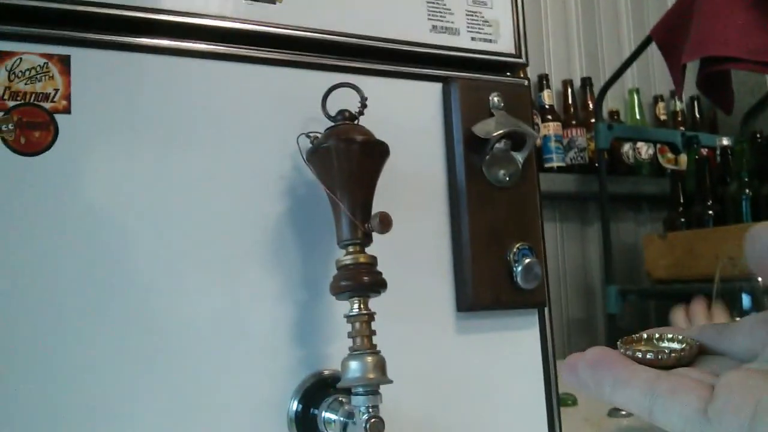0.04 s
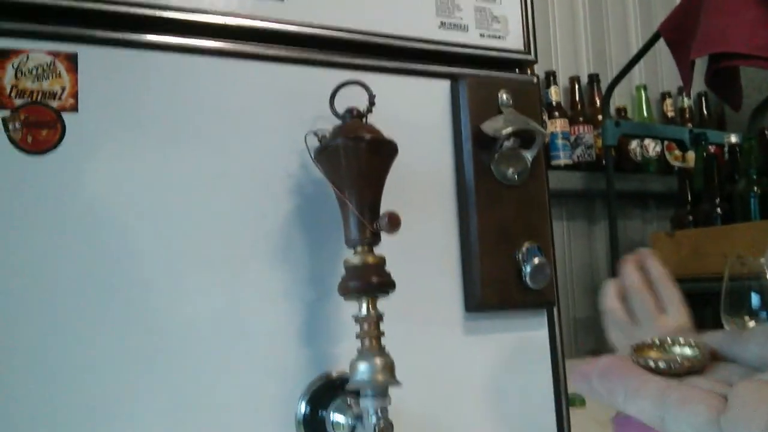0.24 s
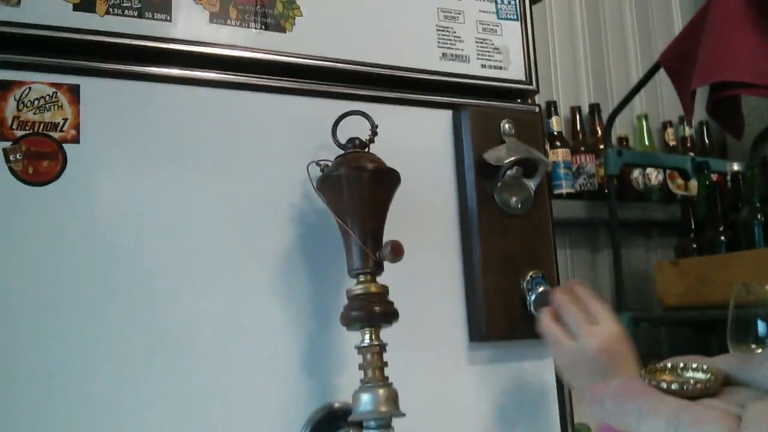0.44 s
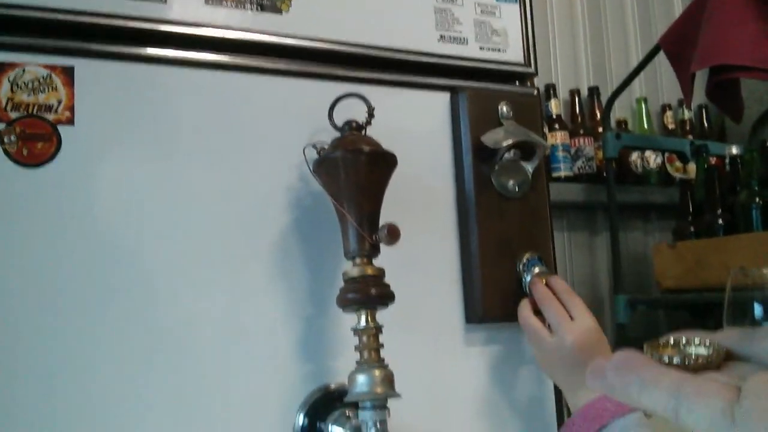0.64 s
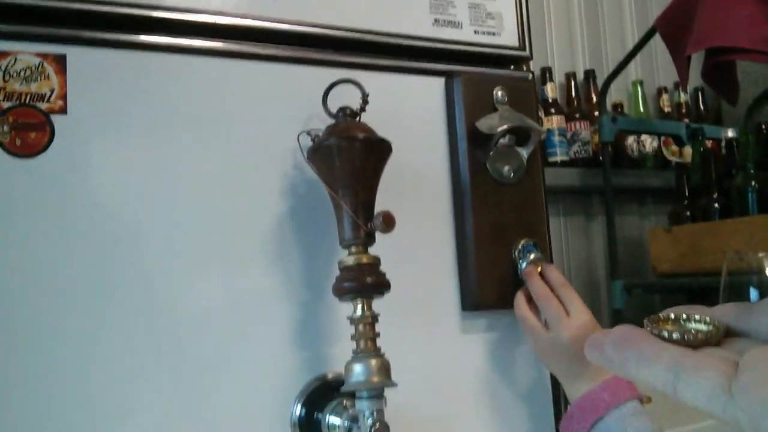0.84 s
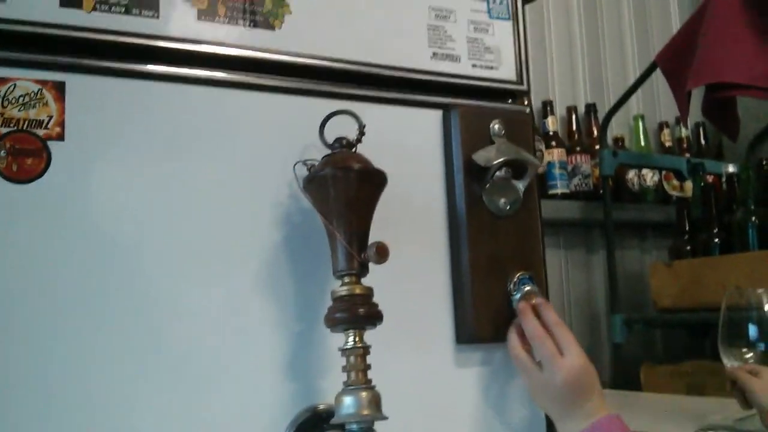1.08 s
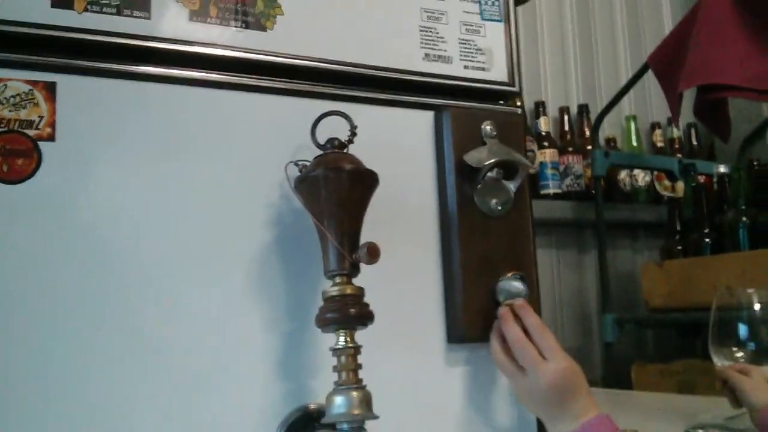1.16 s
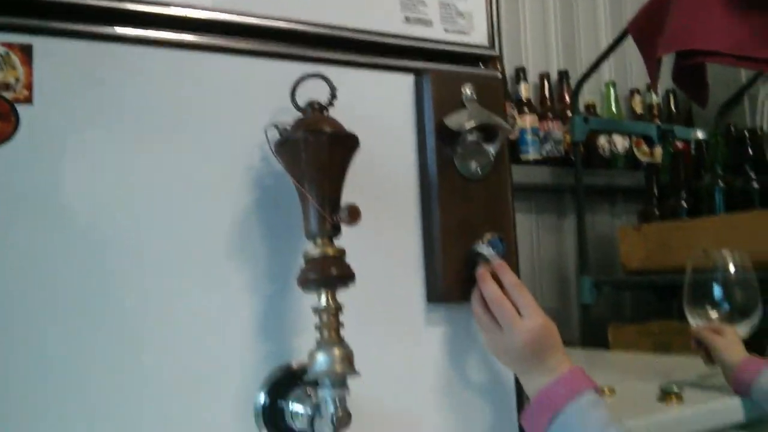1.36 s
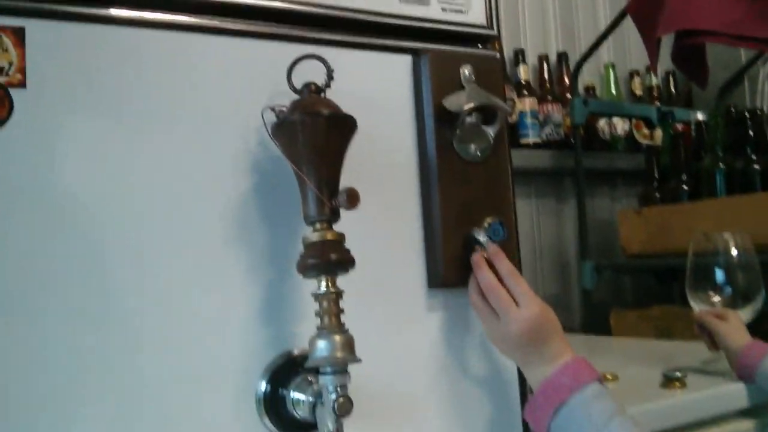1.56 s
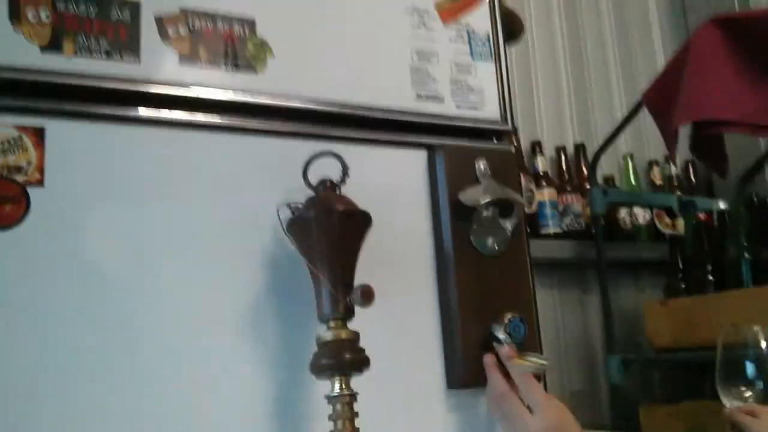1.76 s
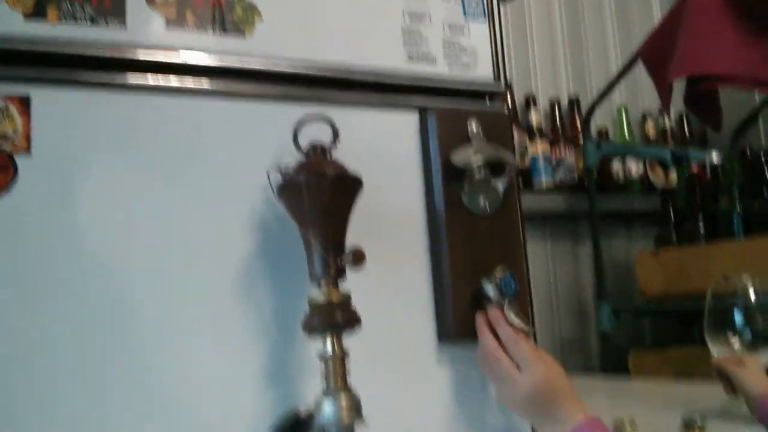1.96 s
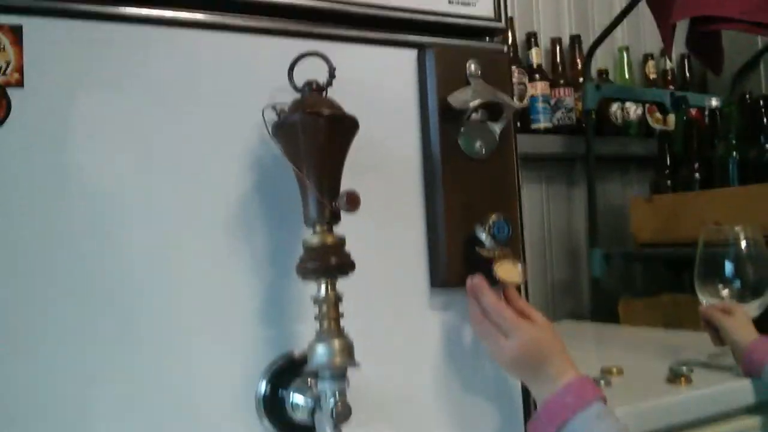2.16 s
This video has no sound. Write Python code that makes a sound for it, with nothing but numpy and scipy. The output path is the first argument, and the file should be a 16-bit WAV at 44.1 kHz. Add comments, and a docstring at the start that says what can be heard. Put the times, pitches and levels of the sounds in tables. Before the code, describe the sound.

Three bright metallic clicks of bottle caps snapping to a wall magnet, with tiny scrapes between

```python
"""A small room with a wooden wall board: steel bottle caps are offered by hand to a magnet in it. Each landing
is a few contacts that ring cap modes, clash the rim as noise and knock board modes. Between clacks, caps scrape
(random slips through resonances), tap, squeak (gliding sine) and rustle (noise). A cooler hums steadily behind:
unsteady motor tones over low noise. Apart from it, faint low thumps and thin tones swell and fade now and then."""
import sys
import numpy as np
from scipy import signal
from scipy.fft import rfft, irfft, next_fast_len
from scipy.io import wavfile
from scipy.ndimage import map_coordinates

SR = 44100
rng = np.random.default_rng(int(sys.argv[2]) if len(sys.argv) > 2 else 0)


def inscribe(sig):
    """Save sig as 16-bit PCM at rate SR to the path in sys.argv[1].

    A 1-D sig is mono; a 2-D sig holds one channel per row.
    Samples are clipped to [-1, 1] before scaling.
    """
    pcm = np.round(np.clip(np.atleast_2d(sig).T, -1, 1) * 32767)
    wavfile.write(sys.argv[1], SR, pcm.astype(np.int16))


N = 97946

# cooler motor tones: f/Hz, rms level/dB, waver/dB
HUM_TONES = [(49, -63, 3), (235, -63, 3), (328, -59.5, 1.8)]
# spectrum of the cooler's air rush: f/Hz, relative density/dB
AIR_SPECTRUM = [(15, -34.5), (25, -7), (76, 1.5), (161, -6.5), (229, 0), (277, -8.5), (344, -12.5),
                (384, -18), (560, -27.5), (775, -15.5), (840, -25), (1290, -29.5), (1440, -43.5),
                (1840, -39.5), (2220, -54), (2990, -51), (3340, -64.5), (5880, -43.5), (16000, -51.5)]
# gain over the whole cooler: t/s, level/dB
COOLER_LEVEL = [(0, -2), (.15, -0.5), (.6, 1), (1.1, 1), (1.5, 0), (1.9, 0.5), (2.2, 1.5)]
HUM_DRIFT_HZ, AIR_DB, AIR_SWELL_DB = 1.5, -53, 1
# faint tones that come and go: t/s, length/s, f/Hz, level/dB
SWELLS = [(0.132, 0.061, 100, -45.5), (.58, 0.064, 74, -45.5), (1.0, 0.081, 65.3, -46),
          (0.71, 0.46, 2730, -82.5), (1.823, 0.093, 213.3, -48), (1.85, 0.27, 476.5, -57.5)]

# spectrum of hands and sleeves: f/Hz, relative density/dB
RUSTLE_SPECTRUM = [(500, -8.5), (1000, 6.5), (2000, -12), (3500, -13.5), (6000, -8.5), (10000, -19.5),
                   (16000, -27)]
# rustle envelope: t/s, rms level/dB
RUSTLE_LEVEL = [(0, -70.5), (.22, -75.5), (.4, -82), (.75, -71), (1.1, -67.5), (1.5, -71), (1.65, -71),
                (1.8, -75), (2.2, -72)]

# cap edge squeaking as it slides: t/s, f/Hz, level/dB
SQUEAK = [(0.942, 3700, -106), (0.971, 3690, -68), (1.03, 3750, -73), (1.08, 4000, -80), (1.102, 3930, -70)]
SQUEAK_JITTER_HZ = 100

# cap shifts in the hand, drags onto the magnet, is pressed home or rocks flat:
# t/s, length/s, share of length spent swelling, level/dB, kind
SCRAPES = [(1.082, .03, 0.77, -55.5, "shift"), (1.099, 0.014, 0.63, -45.5, "shift"),
           (1.114, 0.035, 0.074, -46.5, "shift"), (1.1931, 0.028, 0.15, -32, "drag"),
           (1.206, 0.024, 0.31, -31.5, "drag"), (1.59, 0.051, 0.61, -53, "press"),
           (1.623, 0.14, 0.284, -61, "press"), (1.824, 0.054, 0.53, -68.5, "press"),
           (1.964, 0.014, 0.52, -24, "rock")]
# cap resonances by kind of scrape: f/Hz, width/Hz, level/dB
SCRAPE_RINGS = {"shift": [(3480, 240, -2.5), (3613, 200, 8), (3840, 340, 4.5), (5200, 540, -6.5),
                (6460, 650, -10), (8110, 900, -15)], "drag": [(4270, 230, -4.5), (4650, 200, -11),
                (5550, 560, 1), (6620, 400, 1), (8180, 400, 1), (9800, 1200, -2)],
                "press": [(3600, 190, -11.5), (4570, 300, 4), (5600, 390, 9.5), (7150, 3600, 1)],
                "rock": [(2640, 149, -8), (3075, 120, 0.5), (3368, 310, 0.5)]}
SLIPS_PER_S, FINGER_DAMP_HZ = 3400, 9700

# a faint tick near the start, then light knocks as caps settle: t/s, f/Hz, level/dB, t60/s
TAPS = [(0.147, 7000, -48, .002), (1.611, 3550, -48, .02), (1.613, 4700, -42, .025),
        (1.614, 5700, -39, .012), (1.617, 1090, -44, .06), (1.73, 780, -53, .06), (1.975, 1300, -37, .03)]
TAP_RISE_S = 0.00095

# cap modes by landing: f/Hz, level/dB, t60/s
FIRST_CAP = [(3620, -7, 0.085), (3968, -5.5, 0.063), (4370, -3, 0.051), (4573, -1.5, 0.049),
             (4750, -11, .033), (5960, -3.5, 0.035), (6133, -1, .06), (6230, -3.5, .022), (8317, 1, 0.019),
             (8230, -1, 0.033), (8505, -2, 0.01), (9200, -4.5, 0.017), (13000, -9.5, 0.018)]
SECOND_CAP = [(3990, -5.5, .024), (4240, 0, 0.017), (4386, -0.5, 0.024), (4580, -0.5, 0.03),
              (5490, -13.5, 0.034), (6270, 0, 0.033), (6340, 4.5, .026), (6350, -0.5, .024),
              (7000, -1, 0.022), (7040, 1.5, 0.023), (10430, -7.5, .018)]
THIRD_RIM = [(3300, -9, 0.045), (4030, -5.5, 0.038), (5610, 9, 0.0095), (5835, 7.5, 0.052), (7480, 2, .022),
             (9370, -8, 0.025)]
THIRD_FLAT = [(5020, -12.5, 0.089), (5650, -6, 0.048), (6500, -4.5, 0.024), (7410, 0, .022),
              (7590, 2, 0.02), (7670, 2.5, .018), (8020, 7, .013), (8230, 3, 0.01), (8640, 2.5, .016)]
# pitches at which the clash of the crimped rim is coloured: f/Hz
CLASH_HZ = [700, 2800, 3900, 5200, 6200, 7300, 8600, 10300, 12000, 15500]
# clash colour by landing, one per CLASH_HZ: relative level/dB
FIRST_CLASH = [-23, -7.5, -10.5, -9.5, 0.5, -4.5, 1, -10.5, -19.5, -24]
SECOND_CLASH = [-35, -11.5, -5, -5, 9, 0.5, 7, 0.5, -10, -17.5]
RIM_CLASH = [-23, -10.5, 3, 2.5, 10.5, 9.5, 14, -6, 3.5, -8]
FLAT_CLASH = [-28, -13.5, -11, -7.5, -1.5, 3, 2, -15, -15.5, -21.5]
# the above grouped by landing: cap modes, clash colour, clash t60/s
CAPS = {"first": (FIRST_CAP, FIRST_CLASH, 0.029), "second": (SECOND_CAP, SECOND_CLASH, 0.037),
        "rim": (THIRD_RIM, RIM_CLASH, 0.073), "flat": (THIRD_FLAT, FLAT_CLASH, 0.019)}
# contacts of cap, magnet and board: t/s, ring level/dB, clash level/dB, knock level/dB, landing
CONTACTS = [(0.5236, -18, -18, -29.5, "first"), (0.5277, -28, -18.5, -38.5, "first"),
            (0.534, -39, -22, -56, "first"), (1.2155, -37, -27, -69, "second"),
            (1.2317, -16, -14.5, -32, "second"), (1.2373, -22.5, -15.5, -29.5, "second"),
            (1.2424, -31, -30.5, -44.5, "second"), (1.9370, -39, -21, -33.5, "rim"),
            (1.9396, -22.5, -28, -46, "rim"), (1.9621, -30, -17, -60, "flat"),
            (1.9634, -15, -8, -38.5, "flat")]
# wooden board modes: f/Hz, level/dB, t60/s
BOARD_MODES = [(140, -6.5, 0.07), (176.5, -1.5, 0.069), (702.5, -10.5, 0.1), (1100, -2, .04),
               (1263, -3, .035), (1440, -4.5, 0.046), (1876, -3, 0.029), (2287, -14, 0.11)]
RING_RISE_S, CLASH_RISE_S, BOARD_RISE_S = 0.0006, 0.00084, 0.0016
SCATTER_DB = 1.5  # spread of mode levels, blow to blow
PHASE_JITTER_RAD, PHASE_STEP_S = 0.55, 0.002  # roughens and slightly widens each mode

# room decay: f/Hz, t60/s
ROOM_T60 = [(150, 0.44), (700, 0.26), (2000, 0.25), (5000, 0.27), (8000, 0.23), (15000, 0.24)]
# room echo colour: f/Hz, relative level/dB
ROOM_COLOUR = [(150, 3.5), (1000, 2.5), (3000, -4), (6000, 2.5), (9000, 3), (15000, 4)]
ROOM_DB, ROOM_DELAY_S, ROOM_BUILD_S = -5.5, 0.0069, 0.001
WASH_DB, WASH_T60_S = -34, 0.79  # weak late echo
ROOM_BLUR, ROOM_BLUR_PER_S = 0.016, 260  # echo speed waver: fraction, knots/s

CEILING, TOP_HZ = 0.6, 15900


def amp(db):
    """Decibels to gain."""
    return 10 ** (np.asarray(db) / 20)


def unit(x):
    """Scale to rms 1."""
    return x / np.sqrt(np.mean(x ** 2) + 1e-20)


def along(points, hz):
    """Interpolate (f/Hz, value) points on a log axis."""
    f, v = np.transpose(points)
    return np.interp(np.log(hz + 1), np.log(f + 1), v)


def level(rows):
    """Gain per sample from (t/s, level/dB) points."""
    return amp(np.interp(np.arange(N) / SR, *np.transpose(rows)))


def wobble(knots_per_s):
    """Smooth random curve through normal-distributed knots."""
    knots = rng.standard_normal(int(N * knots_per_s / SR) + 4)
    return map_coordinates(knots, [np.arange(N) * knots_per_s / SR])


def filtered(x, response):
    """Multiply the spectrum of x by a response of frequency."""
    m = next_fast_len(len(x) + SR // 2)
    return irfft(rfft(x, m) * response(np.fft.rfftfreq(m, 1 / SR)), m)[:len(x)]


def noise(spectrum, size):
    """Coloured noise of rms 1."""
    return unit(filtered(rng.standard_normal(size), lambda hz: amp(along(spectrum, hz))))


def tone(hz):
    """Sine that follows a pitch given per sample."""
    return np.sin(2 * np.pi * np.cumsum(hz) / SR)


def fade(t, t60):
    """Exponential decay, -60 dB at t60."""
    return np.exp(-np.log(1000) * t / t60)


def rise(t, rise_s):
    """Exponential onset of a blow."""
    return 1 - np.exp(-t / rise_s)


def ring(modes, t):
    """Damped modes with scattered levels; random phase jitter roughens and slightly widens each."""
    out = np.zeros(len(t))
    for hz, db, t60 in modes:
        gain = amp(db + SCATTER_DB * rng.normal())
        knots = rng.standard_normal(400)
        jitter = PHASE_JITTER_RAD * np.interp(t, np.arange(400) * PHASE_STEP_S, knots)
        out += gain * fade(t, t60) * np.sin(2 * np.pi * hz * t + jitter)
    return out


def add(track, s, sound):
    """Mix a sound in at time s."""
    part = track[round(s * SR):][:len(sound)]
    part += sound[:len(part)]


def in_room(x):
    """Direct sound plus a delayed noise-tail echo whose pitch wavers, blurring any ring."""
    hz, t, z = signal.stft(rng.standard_normal(SR), SR, nperseg=256)
    decay = fade(t, along(ROOM_T60, hz)[:, None]) + amp(WASH_DB) * fade(t, WASH_T60_S)
    colour = amp(along(ROOM_COLOUR, hz))[:, None]
    tail = signal.istft(z * decay * colour, SR, nperseg=256)[1]
    since_delay = np.maximum(np.arange(len(tail)) / SR - ROOM_DELAY_S, 0)
    tail = tail * rise(since_delay, ROOM_BUILD_S)
    echo = signal.fftconvolve(x, amp(ROOM_DB) * tail / np.linalg.norm(tail))
    speed = 1 + ROOM_BLUR * wobble(ROOM_BLUR_PER_S)[:len(echo)]
    echo = map_coordinates(echo, [np.cumsum(speed)])
    add(echo, 0, x)
    return echo


def cooler():
    """Motor tones unsteady in pitch and level, over a low rush of air."""
    tones = np.zeros(N)
    for hz, db, waver_db in HUM_TONES:
        gain = amp(db + waver_db * wobble(6.1)) * np.sqrt(2)  # rms to peak
        tones += gain * tone(hz + HUM_DRIFT_HZ * wobble(5.2))
    air = amp(AIR_DB + AIR_SWELL_DB * wobble(6.9)) * noise(AIR_SPECTRUM, N)
    return level(COOLER_LEVEL) * (tones + air)


def swells():
    """Faint sines under sin-squared envelopes, random in phase."""
    out = np.zeros(N)
    for s, length, hz, db in SWELLS:
        t = np.arange(round(length * SR)) / SR
        envelope = amp(db) * np.sin(np.pi * t / length) ** 2
        add(out, s, envelope * np.sin(2 * np.pi * (hz * t + rng.random())))
    return out


def rustle():
    """Hands and sleeves: coloured noise under a slow envelope."""
    return level(RUSTLE_LEVEL) * noise(RUSTLE_SPECTRUM, N)


def squeak():
    """Sliding cap edge: a thin, jittery tone, climbing for most of its course."""
    s, hz, db = np.transpose(SQUEAK)
    t = np.arange(N) / SR
    pitch = np.interp(t, s, hz) + SQUEAK_JITTER_HZ * wobble(970)
    sounding = (t > s[0]) * (t < s[-1])
    return amp(np.interp(t, s, db)) * sounding * tone(pitch)


def held_cap(rings, hz):
    """Response of a finger-damped cap: band-pass resonances of alternating sign, treble cut."""
    body = 0
    for k, (centre, width, db) in enumerate(rings):
        loss = 1j * hz * width
        body = body + (-1) ** k * amp(db) * loss / (centre * centre - hz * hz + loss)
    return body / (1 + (hz / FINGER_DAMP_HZ) ** 6)


def scrapes():
    """Tiny irregular slips excite a cap held in the fingers."""
    out, t = np.zeros(N), np.arange(SR // 2) / SR
    for s, length, swell, db, kind in SCRAPES:
        slips = rng.standard_normal(len(t)) * (rng.random(len(t)) < SLIPS_PER_S / SR)
        scrape = unit(filtered(slips, lambda hz: held_cap(SCRAPE_RINGS[kind], hz)))
        stroke = np.interp(t / length, [0, np.clip(swell, 0.05, 0.95), 1], [0, 1, 0])
        add(out, s, in_room(amp(db) * stroke * scrape))
    return out


def taps():
    """A faint tick and light knocks, one damped resonance each."""
    out, t = np.zeros(N), np.arange(SR // 2) / SR
    for s, hz, db, t60 in TAPS:
        add(out, s, in_room(ring([(hz, db, t60)], t) * rise(t, TAP_RISE_S)))
    return out


def clacks():
    """Each contact rings the cap, clashes its rim and knocks the board."""
    out, t = np.zeros(N), np.arange(SR // 2) / SR
    for s, ring_db, clash_db, knock_db, landing in CONTACTS:
        modes, colour, clash_t60 = CAPS[landing]
        steel = ring(modes, t) * rise(t, RING_RISE_S)
        clash = noise(list(zip(CLASH_HZ, colour)), len(t))
        clash = clash * fade(t, clash_t60) * rise(t, CLASH_RISE_S)
        wood = ring(BOARD_MODES, t) * rise(t, BOARD_RISE_S)
        add(out, s, in_room(amp(ring_db) * steel + amp(clash_db) * clash + amp(knock_db) * wood))
    return out


def scene():
    """Mono sum of cooler, faint swells, hands and caps."""
    background = cooler() + swells()
    handling = rustle() + squeak() + scrapes() + taps()
    return (background + handling + clacks())[None]


def record(dry):
    """Soft saturation rounds the peaks towards CEILING; a band limit removes all from TOP_HZ up."""
    rounded = dry[0] / (1 + (dry[0] / CEILING) ** 4) ** (1 / 4)
    return filtered(rounded, lambda hz: hz < TOP_HZ)[None]


dry = scene()
out = record(dry)
inscribe(out)
```